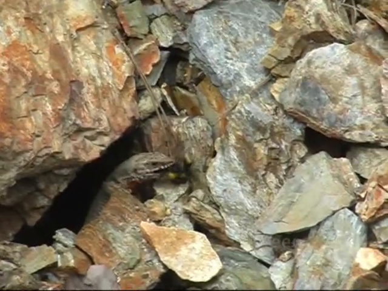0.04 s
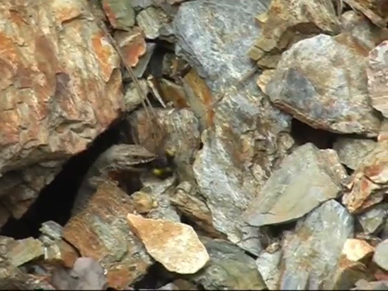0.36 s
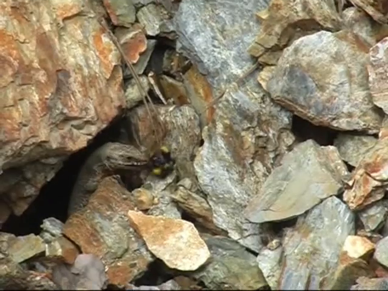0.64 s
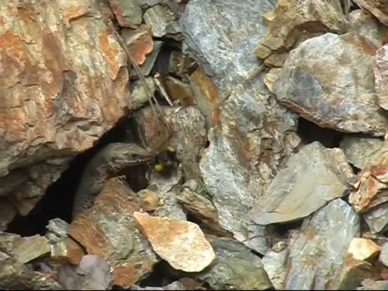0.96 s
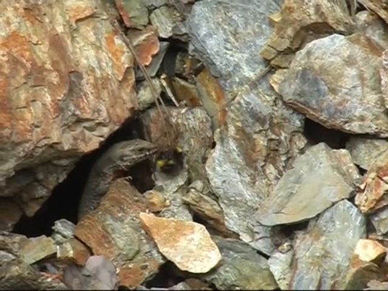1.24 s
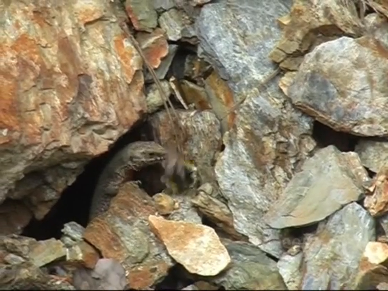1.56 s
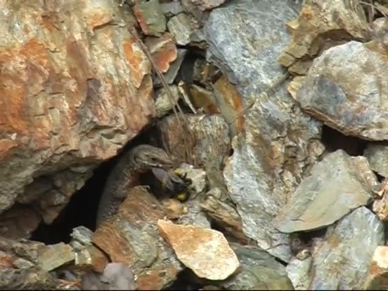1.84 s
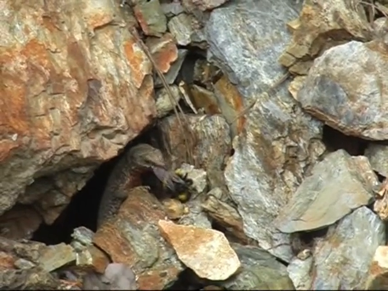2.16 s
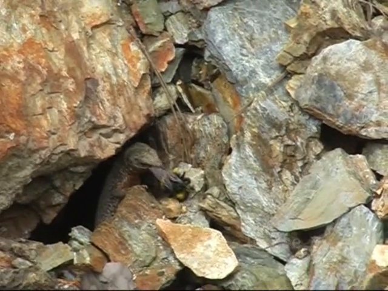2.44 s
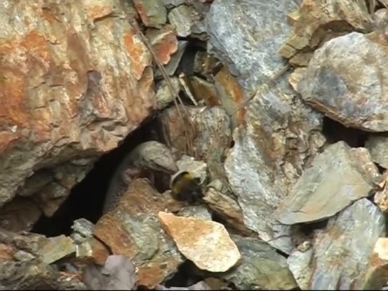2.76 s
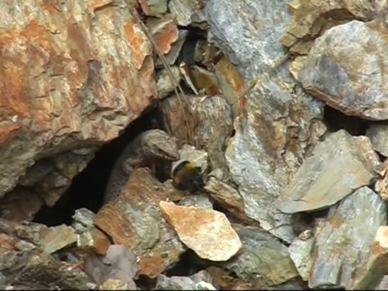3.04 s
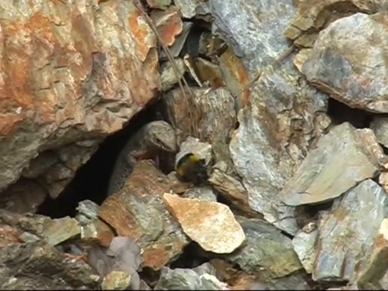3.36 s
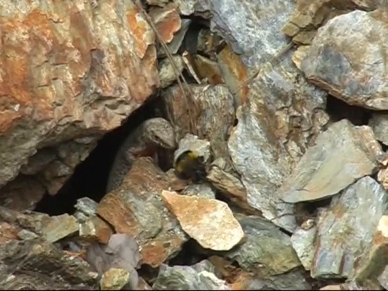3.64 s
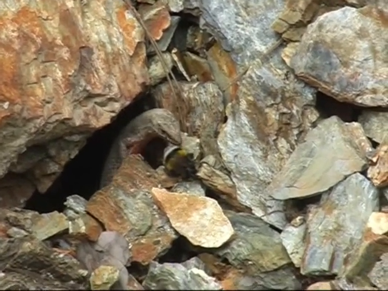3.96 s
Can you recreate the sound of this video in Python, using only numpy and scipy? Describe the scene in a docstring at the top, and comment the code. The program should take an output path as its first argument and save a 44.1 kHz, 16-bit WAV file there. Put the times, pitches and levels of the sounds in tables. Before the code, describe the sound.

A scratchy rustle comes in uneven swells as a lizard and a bumblebee scuffle close by among loose stones. Louder moments bring short falling squeaks, then it dies down over a faint outdoor murmur and hiss.

```python
"""A scratchy rustle close by, probably a lizard and a bumblebee scuffling outdoors among loose stones.
It comes in uneven swells. Quiet moments are mostly dry scraping, made from noise. Louder moments add
a crowd of short squeaks, made from tones that slide down in pitch. One longer scrape rings on one note.
A few soft low bumps, a low murmur and a gently drifting hiss lie underneath."""
import sys
import numpy as np
from scipy import signal
from scipy.fft import rfft, irfft
from scipy.io import wavfile
from scipy.ndimage import uniform_filter1d

SR = 44100
rng = np.random.default_rng(int(sys.argv[2]) if len(sys.argv) > 2 else 0)


def pcm_store(signal):
    """Save signal as 16-bit PCM."""
    levels = np.round(np.clip(np.atleast_2d(signal), -1, 1) * 32767)
    wavfile.write(sys.argv[1], SR, levels.astype(np.int16).T)


N = 176400
T = np.arange(N) / SR

# How the rustle swells and fades: time_s, level_db, treble_against_middle_db
RUSTLE_SWELLS = [(0.0, -49, 2.5), (0.07, -45, -5.5), (0.17, -38.5, -8.5), (0.29, -41, -9.5),
                 (0.375, -38.5, -10), (0.405, -35, -11), (0.43, -36, -6.5), (0.47, -37.5, -11),
                 (0.57, -45, -5), (0.61, -40.5, -5), (0.77, -35.5, -10.5), (0.83, -42, -5), (1.07, -43, -3),
                 (1.11, -37, -10.5), (1.17, -41, -9), (1.21, -41, -6.5), (1.29, -46.5, -5.5),
                 (1.33, -41, -9), (1.5, -37, -6), (1.56, -38, -9), (1.6, -34, -11), (1.73, -38, -6.5),
                 (1.82, -43, -7), (1.98, -47.5, -8), (2.05, -36, -6.5), (2.1, -35.5, -8.5),
                 (2.19, -36, -5.5), (2.25, -39.5, -8.5), (2.28, -39, -0.5), (2.36, -42, -7),
                 (2.45, -41.5, -10.5), (2.47, -37, -15), (2.51, -38, -5), (2.54, -34.5, -3),
                 (2.62, -36.5, -12), (2.69, -34.5, -11), (2.75, -44, -8), (2.83, -41, -9), (2.86, -45, -9),
                 (2.89, -39.5, -8), (2.97, -42.5, -11), (3.02, -39, -6), (3.03, -38.5, -10),
                 (3.09, -43, -8.5), (3.13, -41, -8.5), (3.18, -47.5, -2), (3.235, -39.5, -8),
                 (3.28, -52, 5), (3.49, -44, -5), (3.59, -53.5, 4), (3.65, -45.5, -6), (3.84, -48.5, -1.5),
                 (4.0, -48, -8)]
# Tone of the rustle's middle range: frequency_hz, gain_db
MIDDLE_TONE = [(300, -25), (550, -10), (850, -12.5), (1100, -2.5), (1550, -3), (2100, 1), (2750, -3.5),
               (3200, -8.5), (3800, -15), (5000, -48)]
# Tone of the rustle's treble: frequency_hz, gain_db
TREBLE_TONE = [(2800, -14), (3800, -5), (4600, -1.5), (5750, 1), (6500, -9.5), (7500, -14), (10500, -5.5),
               (13000, -12), (15000, -35)]
# The clearest squeaks: peak_time_s, pitch_hz, fall_octaves_per_s, length_s, level_db
CLEAR_SQUEAKS = [(.104, 1970, 28, 0.055, -42), (.125, 1222, 7, .08, -39.5), (.146, 2530, 0.5, 0.041, -36.5),
                 (.162, 2105, 10.5, 0.052, -34), (.215, 1755, 4, 0.12, -38.5), (.274, 3140, 12, .03, -38.5),
                 (.272, 1113, 14.5, 0.048, -37.5), (.278, 3900, 3, 0.032, -42), (.351, 1693, 7, 0.046, -32),
                 (.386, 2610, 23, 0.021, -28), (.397, 5260, 15, .022, -37), (.404, 2100, 4.5, .065, -34),
                 (.69, 2645, 2, .06, -38), (.716, 2480, -2, 0.046, -35), (.764, 2550, 30.5, .035, -28.5),
                 (1.112, 2676, 14, 0.039, -32), (1.115, 1281, 7, .05, -35.5), (1.209, 1990, 9, 0.033, -37),
                 (1.209, 1030, 5, .05, -41), (1.212, 5200, 8, .03, -40), (1.407, 1130, 12, .035, -38),
                 (1.435, 1310, 16, 0.061, -35.5), (1.474, 2483, 7, .025, -33.5),
                 (1.526, 1635, 9, 0.033, -34.5), (1.537, 2658, 9, .025, -33), (1.6, 2870, 12, .035, -34),
                 (1.6, 1960, 5, 0.06, -29), (1.656, 2850, 8, 0.033, -32), (1.684, 2430, 4, .035, -42),
                 (1.69, 2870, 12, 0.058, -36), (1.72, 2530, 10, 0.092, -37.5),
                 (1.759, 1714, 28, 0.019, -34), (2.045, 2540, 5, 0.032, -27.5),
                 (2.072, 2790, 6.5, 0.051, -29.5), (2.096, 1645, 5, 0.062, -43),
                 (2.112, 2654, 10, .07, -33.5), (2.142, 1460, 1.5, 0.032, -32),
                 (2.182, 1990, 10.5, .06, -37), (2.19, 987, 5.5, 0.04, -36.5),
                 (2.274, 1356, 1, 0.038, -35.5), (2.282, 2663, 8.5, 0.056, -32.5),
                 (2.526, 2530, 11.5, .04, -27.5), (2.534, 4844, 3, .035, -33.5),
                 (2.536, 6000, 2, .028, -37), (2.549, 2150, 12, 0.021, -25.5), (2.564, 1523, 4, .05, -41),
                 (2.57, 750, 5.5, .05, -40), (2.609, 2690, 17, .025, -33), (2.885, 2460, 16, .045, -36.5),
                 (2.909, 1933, 2, 0.046, -37.5), (3.013, 2086, 1, .06, -38), (3.013, 5350, 0, 0.03, -34.5),
                 (3.013, 6300, 0, 0.032, -43), (3.215, 2080, 1, .045, -39), (3.228, 2760, 8, 0.039, -41),
                 (3.237, 1512, 3, 0.038, -45)]
# Narrow bands that the scraping sets ringing: pitch_hz, width_hz, gain_db
RINGING_BANDS = [(550, 8, 0), (851, 31, 0), (1452, 9.7, 4), (1610, 19, 7), (2497, 20, 2.5)]
# Soft low bumps: centre_s, length_s, level_db
LOW_BUMPS = [(0.27, 0.049, -47), (0.42, 0.054, -42), (0.472, 0.073, -43.5), (2.07, 0.12, -49),
             (3.19, 0.068, -51)]
# Tone of the bumps: frequency_hz, gain_db
BUMP_TONE = [(18, -55), (45, -17), (65, -2), (110, 5), (220, 3.5), (400, -6), (900, -34)]
# Tone of the outdoor murmur: frequency_hz, gain_db
MURMUR_TONE = [(20, -47), (48, -11.5), (108, -0.5), (145, -8), (186, 3), (235, 0.5), (300, -4.5), (600, -4),
               (1100, -9), (1800, -9), (3300, -8.5), (5200, -9), (7600, -62), (12000, -20.5)]
# How the murmur drifts in loudness: time_s, level_db
MURMUR_DRIFT = [(0, -47), (1, -48), (1.7, -47.5), (2.4, -48.5), (3.4, -51.5), (4, -52)]
# Tone of the high hiss: frequency_hz, gain_db
HISS_TONE = [(3000, -15), (5400, -17), (6500, 1), (7600, -16.5), (9500, 2.5), (12500, 2), (14500, 0.5),
             (16000, -27)]
# How the hiss drifts in loudness: time_s, level_db
HISS_DRIFT = [(0.0, -49.5), (0.32, -51), (1.64, -50), (2.28, -50.5), (2.92, -52), (3.44, -47.5),
              (3.88, -52), (4.0, -58)]
# How wide the background sounds: frequency_hz, side_against_centre_db
BACKGROUND_WIDTH = [(60, -0.5), (200, -7.5), (1200, -9), (4400, -3), (6500, 4.5), (8100, 18.5),
                    (10500, -7.5), (15000, -2.5)]


def rustle():
    """Dry scraping that turns squeaky as it grows stronger; the stones scatter a little to the sides."""
    level_db = curve(RUSTLE_SWELLS)
    middle_gain = undb(level_db)
    treble_gain = undb(level_db + curve(RUSTLE_SWELLS, column=2) - .25)
    squeaky = .5 + .5 * np.tanh((level_db + 44.5) / 5.5)  # 0 to 1, halfway at -44.5 dB
    middle_squeaks = squeaky * squeak_crowd(MIDDLE_TONE, 750.6, 3500, fall_octaves_per_s=7.36)
    middle = undb(-1.5) * middle_squeaks + undb(-5.5) * scraping(MIDDLE_TONE)
    treble_squeaks = squeaky * squeak_crowd(TREBLE_TONE, 3600, 6800, fall_octaves_per_s=3.68)
    treble = unit(treble_squeaks + scraping(TREBLE_TONE))
    centre = middle_gain * middle + treble_gain * treble + undb(-1) * squeaks(CLEAR_SQUEAKS)
    side = middle_gain * noise(MIDDLE_TONE) + undb(2) * treble_gain * noise(TREBLE_TONE)
    return stereo(centre + ringing_scrape(), undb(-11) * side, pan_db=-2.5)


def squeaks(rows, rise_share=.3):
    """Short raspy tones that swell quickly and fade, nearly all sliding down in pitch."""
    sound = np.zeros(N)
    waver = 1 + .009 * wobble(rate_hz=300)  # unsteady pitch
    rasp = 1 + .15 * wobble(rate_hz=700)  # unsteady loudness
    for peak_s, pitch_hz, fall, length_s, level_db in rows:
        start_s, end_s = peak_s - rise_share * length_s, peak_s + (1 - rise_share) * length_s
        span = slice(max(int(start_s * SR), 0), max(int(end_s * SR), 0))
        sliding_hz = pitch_hz * 2 ** (-fall * (T[span] - peak_s)) * waver[span]
        phase = 2 * np.pi * np.cumsum(sliding_hz) / SR
        fade = np.sin(np.interp(T[span], [start_s, peak_s, end_s], [0, np.pi / 2, np.pi])) ** 2
        sound[span] += undb(level_db) * fade * np.sin(phase)
    return sound * rasp


def squeak_crowd(tone, low_hz, high_hz, fall_octaves_per_s, squeaks_per_s=340):
    """Many random falling squeaks that overlap into one even, ringing sound."""
    when, height, slope, length, size = rng.random((int(squeaks_per_s * N / SR), 5)).T
    pitch_hz = low_hz + (high_hz - low_hz) * height
    fall = fall_octaves_per_s * (1 + .52 * (2 * slope - 1))
    length_s = .046 * (.5 + length)
    level_db = -1.7 * np.log(1 - size)  # most are alike, a few stand out
    crowd = squeaks(zip(when * N / SR, pitch_hz, fall, length_s, level_db))
    strength = np.sqrt(uniform_filter1d(crowd ** 2, SR // 20) + 1e-6)  # averaged over 50 ms
    return add_ringing(colour(crowd / strength, tone))


def scraping(tone):
    """Dry rubbing: noise that rings a little at a few pitches."""
    return add_ringing(noise(tone))


def ringing_scrape(start_s=.47, end_s=1.14):
    """One drawn-out scrape: friction makes a single narrow band ring."""
    note = unit(ring(rng.standard_normal(N), pitch_hz=1530, width_hz=260))
    fade = np.sqrt(swell((start_s + end_s) / 2, end_s - start_s))
    return undb(-41.5) * note * fade


def bumps():
    """Dull, wide thuds: brief swells of low noise."""
    strength = sum(undb(db) * swell(centre_s, length_s) for centre_s, length_s, db in LOW_BUMPS)
    return strength * stereo(noise(BUMP_TONE), undb(-.5) * noise(BUMP_TONE), pan_db=0)


def background():
    """A low outdoor murmur and a high hiss, both wide and slowly drifting in loudness."""
    murmur_gain = undb(curve(MURMUR_DRIFT) + .4 * wobble(rate_hz=3.5))
    hiss_gain = undb(curve(HISS_DRIFT) - 1.5)
    centre, side = (murmur_gain * noise(MURMUR_TONE) + hiss_gain * noise(HISS_TONE) for _ in range(2))
    return stereo(centre, colour(side, BACKGROUND_WIDTH), pan_db=-1.5)


def ring(sound, pitch_hz, width_hz):
    """Keep one narrow band of a sound, so that it rings at that pitch."""
    return signal.lfilter(*signal.iirpeak(pitch_hz, pitch_hz / width_hz, fs=SR), sound)


def add_ringing(sound):
    """Add all the ringing bands to a sound, then scale it to strength 1."""
    return unit(sound + sum(undb(db) * ring(sound, hz, width) for hz, width, db in RINGING_BANDS))


def undb(db):
    """Turn decibels into a number to multiply by."""
    return 10 ** (np.asarray(db) / 20)


def unit(sound):
    """Scale a sound to an average strength (rms) of 1."""
    return sound / np.sqrt(np.mean(sound ** 2))


def curve(rows, column=1):
    """One column of a table, joined by straight lines in time."""
    rows = np.array(rows)
    return np.interp(T, rows[:, 0], rows[:, column])


def colour(sound, tone):
    """Turn each frequency up or down as a tone table says."""
    hz, db = np.array(tone).T
    gain_db = np.interp(np.log(np.fft.rfftfreq(N, 1 / SR) + 1), np.log(hz), db)
    return irfft(rfft(sound) * undb(gain_db), N)


def noise(tone):
    """Noise with the given tone, at strength 1."""
    return unit(colour(rng.standard_normal(N), tone))


def wobble(rate_hz):
    """Smooth random movement around zero, at strength 1."""
    step = int(SR / rate_hz)
    stairs = np.repeat(rng.standard_normal(N // step + 1), step)
    return unit(uniform_filter1d(stairs, step)[:N])


def swell(centre_s, length_s):
    """One smooth rise and fall."""
    return np.cos(np.pi * np.clip((T - centre_s) / length_s, -.5, .5)) ** 2


def stereo(centre, side, pan_db):
    """Make left and right: side adds width, and a negative pan_db leans to the right."""
    return np.array([centre + side, centre - side]) * undb(np.array([[pan_db], [-pan_db]]) / 2)


def scene():
    """The rustle and bumps over the background."""
    return rustle() + bumps() + background()


def record(dry):
    """Cut away the very highest treble."""
    cutoff_hz = 15700
    return signal.sosfilt(signal.ellip(10, .2, 80, cutoff_hz, fs=SR, output="sos"), dry)


dry = scene()
out = record(dry)
pcm_store(out)
```